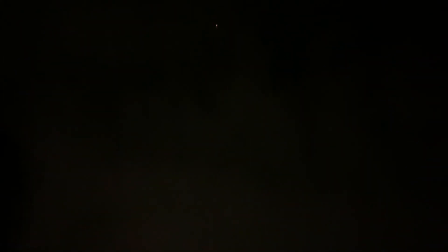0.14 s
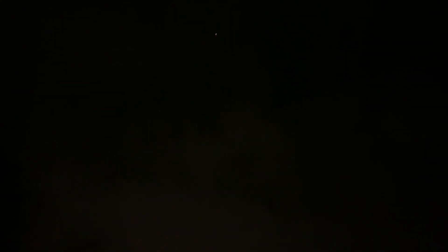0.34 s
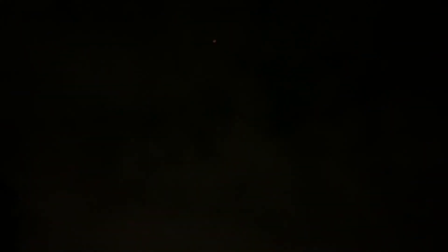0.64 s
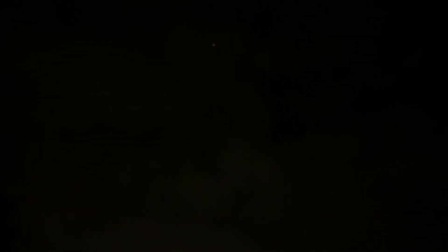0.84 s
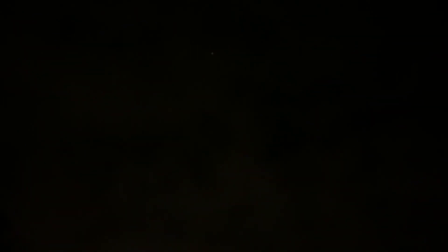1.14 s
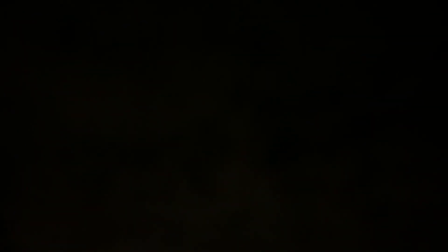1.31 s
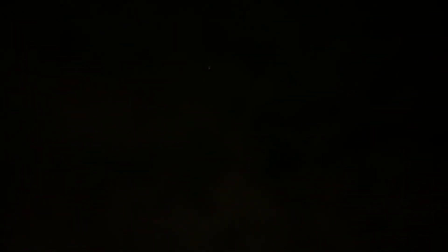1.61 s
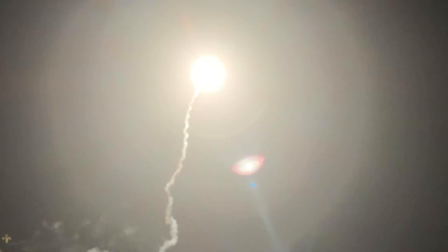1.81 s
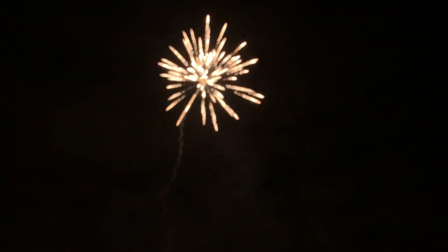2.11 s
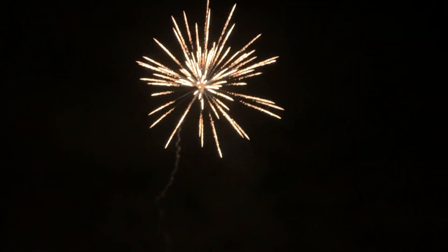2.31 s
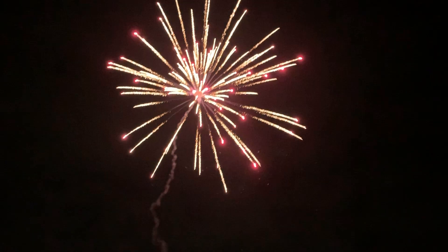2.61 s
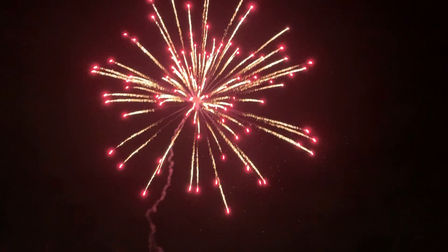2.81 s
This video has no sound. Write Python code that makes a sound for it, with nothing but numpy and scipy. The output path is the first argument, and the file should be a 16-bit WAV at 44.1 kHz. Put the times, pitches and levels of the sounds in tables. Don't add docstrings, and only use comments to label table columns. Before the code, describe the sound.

A firework shell bursts overhead with a sharp cracking boom after a very faint fluttering hiss, echoes rolling away

```python
import sys
import numpy as np
from scipy import signal
from scipy.fft import rfft, irfft, next_fast_len
from scipy.io import wavfile
from scipy.ndimage import uniform_filter1d, map_coordinates

SR = 44100
rng = np.random.default_rng(int(sys.argv[2]) if len(sys.argv) > 2 else 0)


def decibels_to_gain(level_db):
    exponent = np.asarray(level_db, float) / 20
    return 10 ** exponent


def pcm_store(signal):
    levels = np.round(np.clip(np.atleast_2d(signal), -1, 1) * 32767)
    wavfile.write(sys.argv[1], SR, levels.astype(np.int16).T)


N = 130095
T = np.arange(N) / SR

# start_s, boom_db, crack_db, boom_hold_s
SHOCKS = [
    (2.1256, -1.3, -1.5, .0095),
    (2.1436, -8, -.5, .002),
]
# freq_hz, density_db
CRACK_COLOUR = [(1500, 7.5), (5000, -2.5), (10500, -5), (14500, -3), (16500, -34)]
# freq_hz, density_db
SPUTTER_COLOUR = [(300, -9.5), (600, -7.5), (1100, -3), (2200, -17.5), (5500, -18), (8000, -25.5),
                  (9000, -80)]
# freq_hz, density_db
DEBRIS_COLOUR = [(100, -50), (300, -6), (600, -1), (1500, -8), (4000, -16), (8000, -25), (16000, -42)]
# freq_hz, density_db
SWELL_COLOUR = [(100, 1), (200, 17), (500, -15), (1000, 3), (1300, -34), (4000, -21), (6500, -15.5),
                (8000, -57.5)]
# time_s, jet_level_db, spin_depth_db
ROCKET = [(0.0, -55.5, -4.5), (0.29, -57.5, -0.5), (0.84, -60, -2.5), (1.58, -67, -1), (2.1, -64.5, 1.5)]
# freq_hz, density_db
JET_COLOUR = [(500, -20.5), (1600, -17), (2500, -14), (3300, -9.5), (4000, -9.5), (5500, -7), (6600, -5.5),
              (8300, -22.5), (11000, -90)]
# freq_hz, density_db
FIZZ_COLOUR = [(6500, -18), (7800, -24.5), (8800, 5), (10500, 0.5), (13000, -10), (14600, -10),
               (16500, -40)]
# freq_hz, likeness
FIZZ_ALIKE = [(1000, .97)]
# time_s, swing_db
BEAM = [(0, 3), (.8, 4), (1.2, 6), (2.1, 6.5)]
# peak_s, gain_db
SURGES = [
    (.35, 8.5),
    (.73, 6),
    (1.85, 8),
]
# freq_hz, left_lead_rad
PORT_LAG = [(0, 0), (1400, -.2), (2400, 1.6), (3900, .4), (6600, 6.28), (8750, 3.14), (11000, 0),
            (13400, -3.14), (16000, -6.5)]
# time_s, level_db
ECHO_LEVEL = [(2.16, -27.5), (2.2, -33.5), (2.29, -34), (2.35, -30), (2.44, -27.5), (2.52, -27),
              (2.58, -36.5), (2.65, -32.5), (2.72, -37), (2.95, -38)]
# freq_hz, density_db
ECHO_COLOUR = [(20, -18), (80, -8), (220, -4.5), (1500, -20.5), (7000, -31.5), (11000, -38.5), (13000, -46),
               (16500, -62)]
# freq_hz, likeness
ECHO_ALIKE = [(60, .9), (240, .75), (950, .15), (6000, .1), (8000, .96)]
# freq_hz, loss_db_per_s
AIR_LOSS = [(100, 18.5), (1000, 4), (4000, 14), (8000, 36), (12000, 59.5)]
# start_s, level_db
WALL_SLAPS = [
    (2.385, -42),
    (2.441, -36),
    (2.629, -28),
    (2.762, -31.5),
    (2.834, -34),
]
# start_s, level_db
FAR_THUDS = [
    (1.367, -63),
    (1.416, -55),
    (1.501, -58),
    (1.54, -67),
    (1.83, -56),
]
# freq_hz, density_db
FAR_COLOUR = [(25, -17), (70, 5.5), (140, -8), (310, -4), (450, -35.5), (900, -29.5), (2000, -100)]
# freq_hz, density_db
NIGHT_COLOUR = [(20, -23.5), (69, 0.5), (345, -6), (500, -8.5), (1040, -4), (1900, -10), (2500, -16),
                (6000, -85.5)]
# time_s, level_db
RUMBLE_LEVEL = [(0, -66), (.15, -85), (.2, -64), (.7, -67), (.8, -71), (1.3, -77), (2.1, -74)]
# freq_hz, density_db
LEAVES_COLOUR = [(1500, -35), (2500, 8.5), (4000, 19), (5300, 17.5), (6700, -5), (7800, -62), (9000, -55)]
# freq_hz, likeness
DIFFUSE_ALIKE = [(60, 0.89), (240, 0.89), (950, -0.12), (3770, 0.55), (15000, -0.61)]

BURST_S = SHOCKS[0][0]
SPUTTER_S = 2.1178


def unit(x):
    return x / np.sqrt(np.mean(x ** 2) + 1e-20)


def along(points, hz):
    f, v = np.transpose(points)
    return np.interp(np.log(hz + 1), np.log(f + 1), v)


def curves(rows):
    s, *cols = np.transpose(rows)
    return [np.interp(T, s, c) for c in cols]


def wobble(rate):
    knots = rng.standard_normal(int(N * rate / SR) + 4)
    return map_coordinates(knots, [T * rate])


def filtered(x, response):
    m = next_fast_len(N + SR // 2)
    return irfft(rfft(x, m) * response(np.fft.rfftfreq(m, 1 / SR)), m)[..., :N]


def rush(colour, alike, patchy_db, fade=lambda hz, s: 0):
    hz, s, z = signal.stft(rng.standard_normal((2, N)), SR, nperseg=512)
    patches = uniform_filter1d(rng.standard_normal(z.shape[1:]), 6, 0)
    patches = uniform_filter1d(patches, 8, 1)
    gain = decibels_to_gain(patchy_db * unit(patches) - fade(hz[:, None], s))
    turn = np.arccos(np.clip(along(alike, hz), -1, 1))[:, None] / 2
    pair = signal.istft(z * gain * [np.cos(turn), np.sin(turn)], nperseg=512)[1][:, :N]
    mid, side = filtered(pair, lambda f: decibels_to_gain(along(colour, f)))
    norm = np.sqrt(np.mean(decibels_to_gain(along(colour, np.linspace(0, SR / 2, 8192))) ** 2))
    return np.array([mid + side, mid - side]) / norm


def from_sky(pair):
    def port_phase(hz):
        lag = np.interp(hz, *np.transpose(PORT_LAG))
        return np.exp(.5j * np.outer([1, -1], lag))
    return filtered(pair, port_phase)


def boom(start_s, hold_s=.0095):
    from_hz, to_hz, fall_s, t60_s = 770, 80, .0027, .06
    t = np.maximum(T - start_s, 0)
    turns = to_hz * t + (from_hz - to_hz) * fall_s * (1 - np.exp(-t / fall_s))
    rise = np.clip(t / .0003, 0, 1)
    decay = decibels_to_gain(-60 * np.maximum(t - hold_s, 0) / t60_s)
    return -np.cos(2 * np.pi * turns) * rise * decay


def crack(start_s, level_db):
    ring_hz, ring_level, t60_s = 10730, .4, .0024
    u = np.maximum(T - start_s, 0)
    ring = ring_level * np.sin(2 * np.pi * ring_hz * u)
    snap = ring + np.sign(rng.standard_normal(N)) * (u > 0)
    snap = decibels_to_gain(level_db - 60 * u / t60_s) * snap
    return from_sky(filtered(snap, lambda hz: decibels_to_gain(along(CRACK_COLOUR, hz))))


def sputter():
    rise_s, pulse_hz, pulse_db, noise_db = .0012, 365, -6.5, -14.5
    gate = np.clip((T - SPUTTER_S) / rise_s, 0, 1) * np.clip((BURST_S + .0008 - T) / .0006, 0, 1)
    pulse = decibels_to_gain(pulse_db) * gate * np.sin(2 * np.pi * pulse_hz * (T - SPUTTER_S))
    early = decibels_to_gain(-np.maximum(SPUTTER_S + rise_s - T, 0) * 4500) * (T < BURST_S)
    noise = decibels_to_gain(noise_db) * early * rush(SPUTTER_COLOUR, [(500, .7), (3000, .2)], patchy_db=.9)
    return noise * decibels_to_gain([[-1.5], [1.5]]) - pulse


def overpressure():
    push_hz, level_db, t60_s, pan_db = 44, -21, .14, 3
    late = np.maximum(T - BURST_S, 0)
    level = decibels_to_gain(level_db + pan_db * np.array([[1], [-1]]) - 60 * late / t60_s)
    return level * np.sin(2 * np.pi * push_hz * late)


def debris():
    level_db, rise_t60_s, fall_t60_s = -19, .012, .075
    u = T - BURST_S - .011
    level = decibels_to_gain(level_db - 60 * np.abs(u) / np.where(u > 0, fall_t60_s, rise_t60_s))
    return level * (T > BURST_S) * rush(DEBRIS_COLOUR, DIFFUSE_ALIKE, patchy_db=1)


def burst():
    out = sputter() + overpressure() + debris()
    for start_s, boom_db, crack_db, hold_s in SHOCKS:
        out += decibels_to_gain(boom_db) * boom(start_s + .0008, hold_s)
        out += crack(start_s, crack_db)
    return out


def swell():
    level_db, swell_s = -42.5, .0175
    rise = np.clip(1 + (T - SPUTTER_S + .02) / swell_s, 0, 1.4) ** 2
    return decibels_to_gain(level_db) * rise * (T < SPUTTER_S) * rush(SWELL_COLOUR, DIFFUSE_ALIKE, patchy_db=-.5)


def rocket():
    spin_hz, spin_peak_s, top_grows, top_db = 8.13, .348, 2.1, -1.5
    level_db, depth_db = curves(ROCKET)
    spin = np.cos(2 * np.pi * spin_hz * (T - spin_peak_s)) - 1
    jet_db = level_db - .4 * depth_db * spin + .8 * wobble(12)
    jet = decibels_to_gain(jet_db) * rush(JET_COLOUR, [(1000, .79)], patchy_db=.7)
    surge_db = sum(db * np.exp(-((T - s) * spin_hz * 2) ** 2) for s, db in SURGES)
    fizz_db = level_db[0] + top_grows * (level_db - level_db[0]) + top_db
    fizz_db = fizz_db + curves(BEAM)[0] * spin + surge_db
    fizz = decibels_to_gain(fizz_db) * rush(FIZZ_COLOUR, FIZZ_ALIKE, patchy_db=.8)
    return from_sky(jet + fizz) * (T < BURST_S)


def echoes():
    gain_db, wall_cut_hz = 4, 170
    level_db, = curves(ECHO_LEVEL)
    start_s = ECHO_LEVEL[0][0]

    def air(hz, s):
        return along(AIR_LOSS, hz) * np.clip(s - start_s, 0, 1)

    wash = from_sky(rush(ECHO_COLOUR, ECHO_ALIKE, patchy_db=.9, fade=air))
    onset = np.clip((T - start_s + .0093) / .0049, 0, 1)
    slaps = sum(decibels_to_gain(db) * boom(s) for s, db in WALL_SLAPS)
    slaps = filtered(slaps, lambda f: (1j * f / (1j * f + wall_cut_hz)) ** 2)
    return decibels_to_gain(level_db + gain_db + wobble(40)) * onset * wash + slaps


def far_shell():
    tail_db, tail_t60_s, roll_db = -56, 1.4, -73
    t = T - FAR_THUDS[0][0]
    level = (decibels_to_gain(tail_db - 60 * t / tail_t60_s) + decibels_to_gain(roll_db)) * (t > 0)
    thuds = sum(decibels_to_gain(db) * boom(s) for s, db in FAR_THUDS)
    return thuds + level * decibels_to_gain(wobble(25)) * rush(FAR_COLOUR, DIFFUSE_ALIKE, patchy_db=.8)


def whine():
    pitch_hz, peak_s, long_s, level_db = 1010, .87, .18, -72.5
    hz = pitch_hz + 250 * (T - peak_s) + 30 * wobble(40)
    level = decibels_to_gain(level_db + 2.5 * wobble(27.8)) * np.exp(-((T - peak_s) / long_s) ** 2)
    return level * np.sin(2 * np.pi * np.cumsum(hz) / SR)


def night():
    murmur_db, lump_db, leaves_db = -65, .8, -66
    low_db, = curves(RUMBLE_LEVEL)
    low_colour = [(30, -58.5), (50, -6), (75, -7.5), (110, -17), (200, -76)]
    low = decibels_to_gain(low_db + .88 * wobble(15)) * rush(low_colour, DIFFUSE_ALIKE, patchy_db=1)
    leaves = decibels_to_gain(leaves_db) * from_sky(rush(LEAVES_COLOUR, [(1000, .6)], patchy_db=.6))
    murmur = decibels_to_gain(murmur_db + lump_db * wobble(5)) * rush(NIGHT_COLOUR, DIFFUSE_ALIKE, patchy_db=1)
    return murmur + low + leaves


def scene():
    return burst() + swell() + rocket() + echoes() + far_shell() + whine() + night()


def top_cut(x):
    return signal.sosfilt(signal.butter(12, 17160, fs=SR, output="sos"), x)


def record(dry):
    ceiling, hardness, top_hz = .93, 9, 15700
    limited = dry / (1 + np.abs(dry / ceiling) ** hardness) ** (1 / hardness)
    mix = filtered(limited, lambda hz: hz < top_hz)
    return top_cut(mix)


dry = scene()
out = record(dry)
pcm_store(out)
```